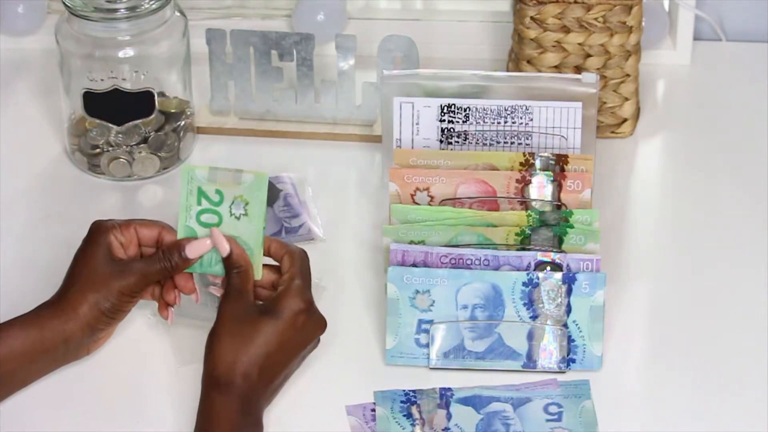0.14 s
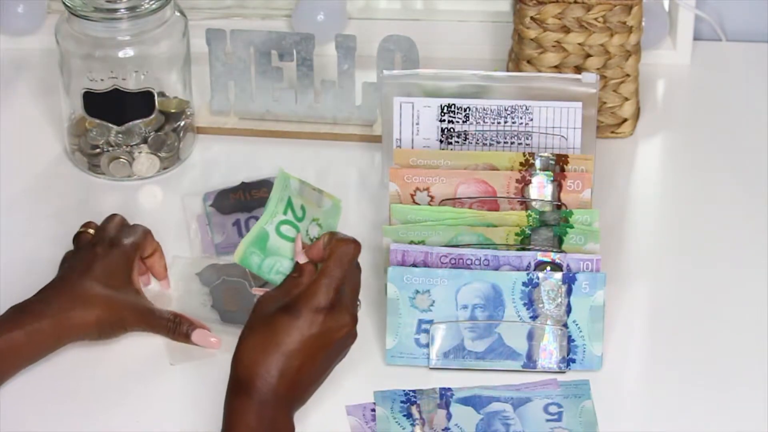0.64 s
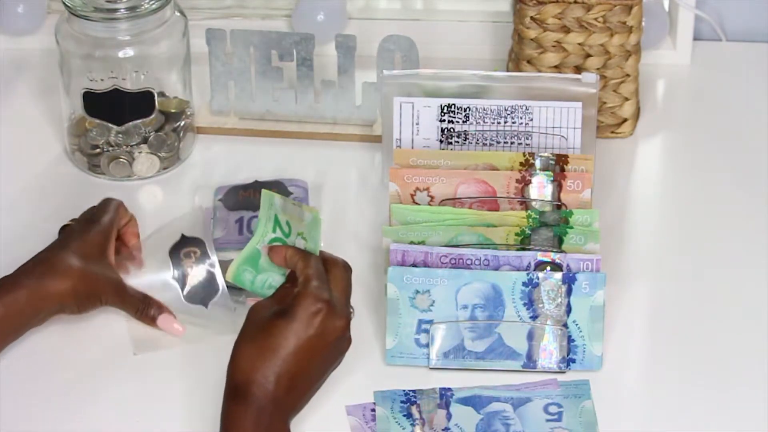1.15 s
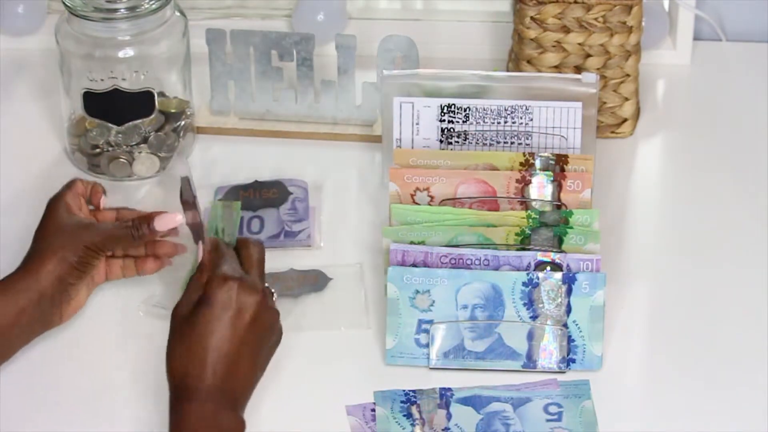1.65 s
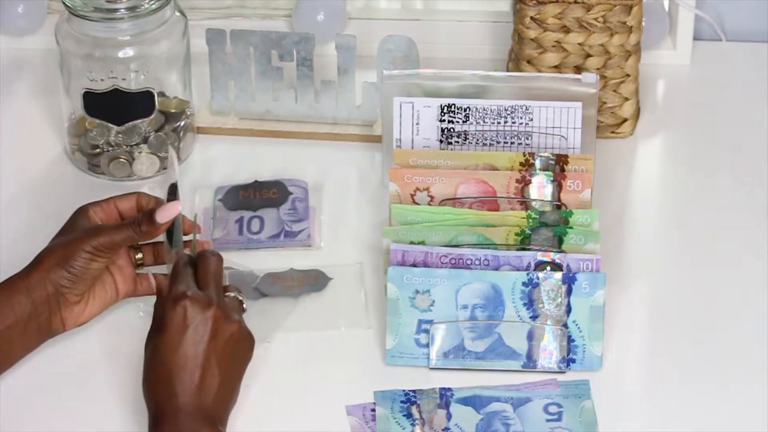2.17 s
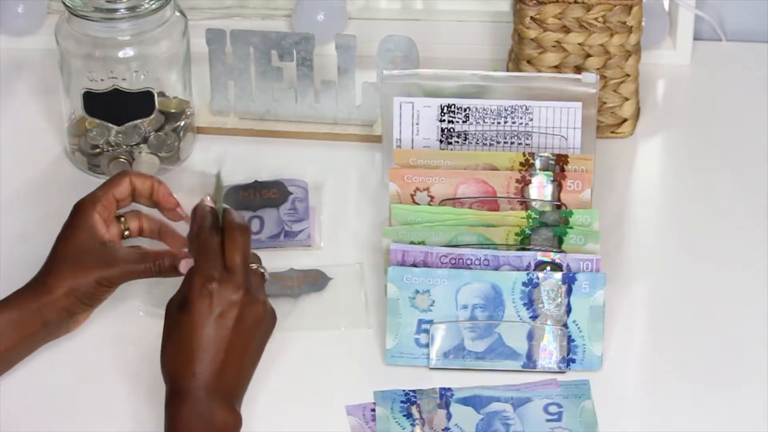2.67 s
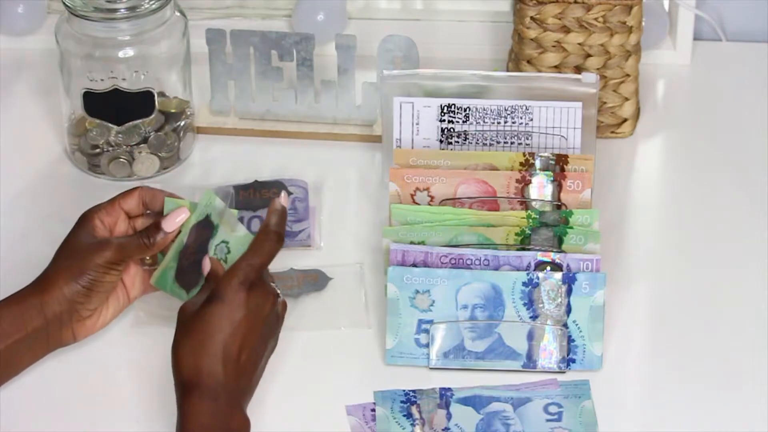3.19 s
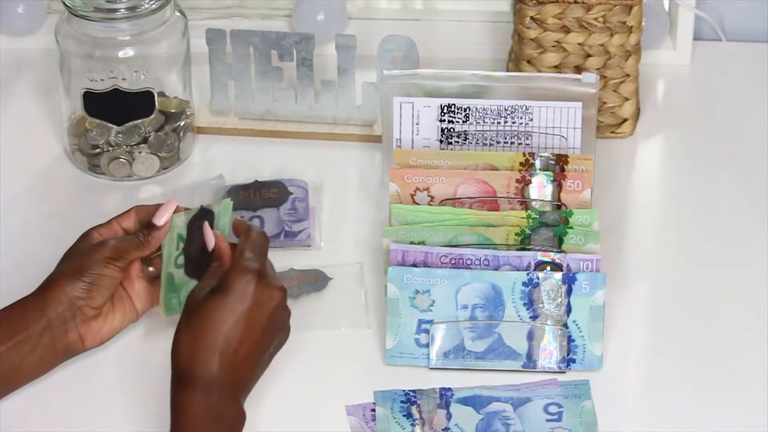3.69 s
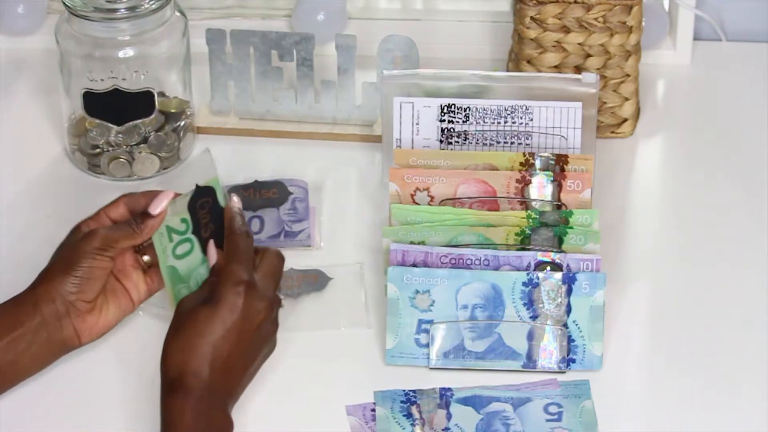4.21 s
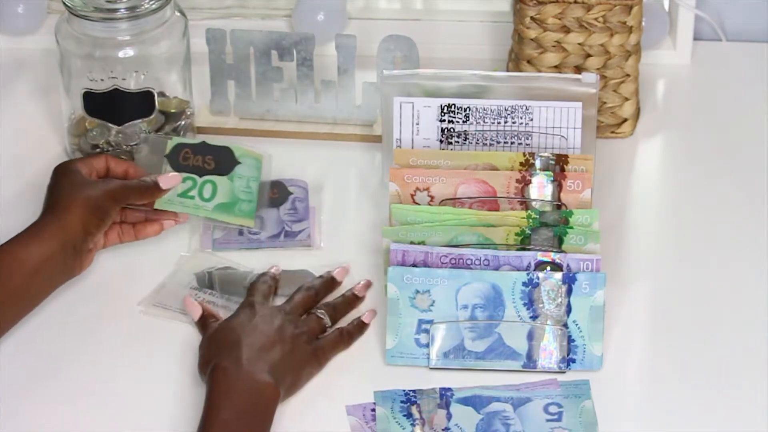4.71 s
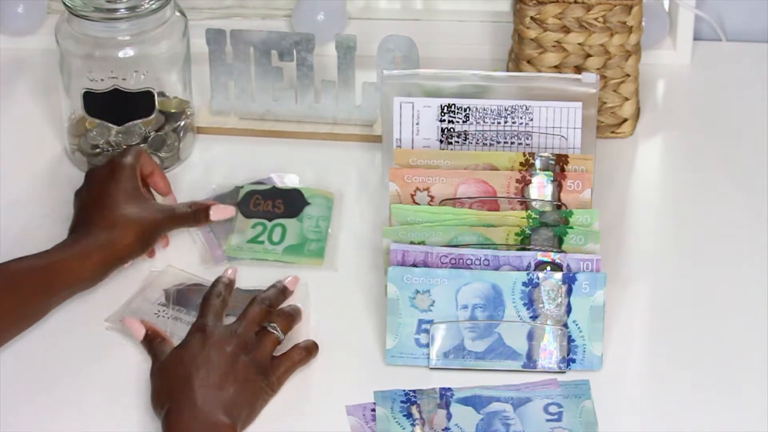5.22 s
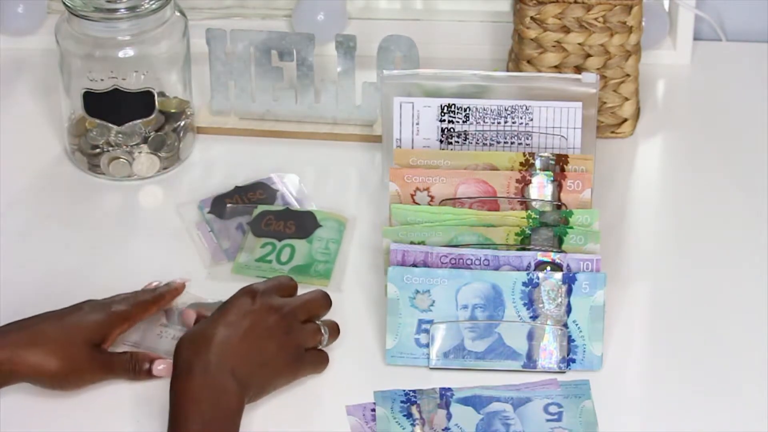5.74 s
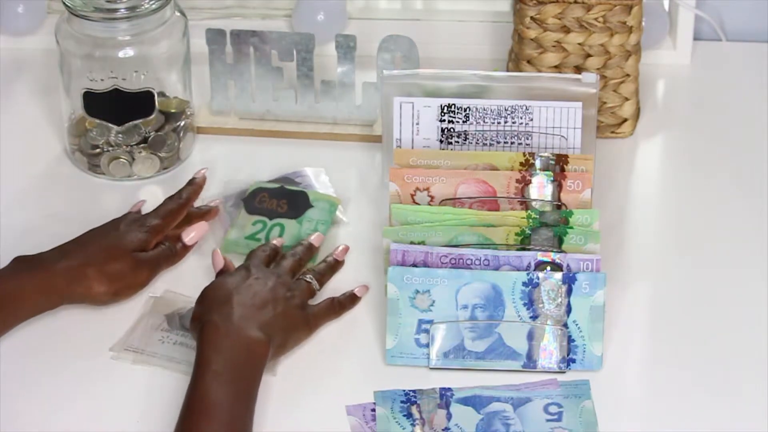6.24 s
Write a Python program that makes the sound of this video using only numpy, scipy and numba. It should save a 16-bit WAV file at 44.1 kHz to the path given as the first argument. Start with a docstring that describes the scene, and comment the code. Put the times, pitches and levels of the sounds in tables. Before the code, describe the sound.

Sharp crinkling clicks and grainy rubs of thin plastic notes, loud at first, then sparse and soft above quiet steady air noise.

```python
"""Stiff polymer banknotes, folded by hand into a clear plastic envelope on a table, half a metre under a phone.
The films snap in bursts of buckling clicks, some with a stronger ring, flap in low thumps and rub with a
grainy hiss; all are shaped noise through resonances. A small room answers with a table bounce and a short
tail. Behind lie a fan's filtered air noise and wavering sine tones. The phone's microphone trims both ends of
the spectrum and its noise suppressor turns down whatever stays near the steady noise."""
import sys
import numpy as np
from scipy import signal
from scipy.fft import rfft, irfft, next_fast_len
from scipy.io import wavfile
from scipy.ndimage import uniform_filter1d
from numba import njit

SR = 44100
rng = np.random.default_rng(int(sys.argv[2]) if len(sys.argv) > 2 else 0)


def volts_from_db(level):
    """Convert decibel levels to linear amplitude ratios."""
    exponent = np.asarray(level, float) / 20
    return 10 ** exponent


def file_out(sig):
    """Save sig as 16-bit WAV at sys.argv[1]."""
    # one column per channel
    cols = np.atleast_2d(sig).T
    # limit, then scale
    lim = np.clip(cols, -1, 1)
    pcm = np.round(lim * 32767).astype(np.int16)
    wavfile.write(sys.argv[1], SR, pcm)


N = 280917
T = np.arange(N) / SR  # s

# All levels of handling sounds are nominal, ahead of the room; fan levels are ahead of the suppressor.
# Fan air, spectrum shape: f/Hz, relative level/dB per Hz
AIR = [(21, -49), (35, -3.5), (123, -11), (163, -5.5), (216, -6.5), (252, -5.5), (286, -6.5), (334, -1),
       (360, -11), (466, -9.5), (907, -12), (979, -11.5), (1910, -17), (12700, -31), (16000, -39)]
# Fan air, left-right likeness: f/Hz, likeness [0-1]
AIR_LIKENESS = [(60, 0.33), (300, 0.26), (640, 0.14), (1500, 0)]
# Fan air, balance: f/Hz, left minus right level/dB
AIR_LEAN = [(100, -4), (400, -2), (1300, 0)]
AIR_DB = -59.5  # rms of the two ears' mean
# Fan blade tone: t/s, f/Hz, level/dB
BLADE = [(0, 278.6, -61), (1, 278.6, -63), (2.299, 274.4, -70.5), (3.2, 283.2, -71), (3.9, 281.5, -62.5),
         (4.2, 289.8, -65.5), (4.5, 294.4, -64.5), (4.9, 281.3, -67), (5.401, 284.4, -64),
         (6.37, 277.7, -64)]
# Fan motor tones: f/Hz, level/dB
MOTOR_TONES = [(92.5, -76), (119, -72), (138.5, -71.5), (207.5, -76), (231, -75.5), (600, -76.5),
               (959, -74.5)]

# Films sliding, one stroke a row: start t/s, firmest t/s, end t/s, rasp level/dB, brightness/dB (+ fizz, - drag)
STROKES = [(-.02, 0.001, 0.014, -54, -36), (0.153, 0.206, 0.45, -62.5, 18), (0.253, 0.315, 0.44, -62, -7),
           (0.417, 0.491, 0.6, -54.5, -7), (0.592, 0.676, 0.75, -63, 6), (.84, 0.962, 1.05, -56.5, -12),
           (1.08, 1.117, 1.29, -63, -3), (1.209, 1.285, 1.388, -48, 9), (1.273, 1.307, 1.39, -61, -11),
           (1.388, 1.474, 1.474, -58.5, -24), (1.576, 1.674, 1.72, -62.5, 12), (1.747, 1.774, 1.85, -65, 3),
           (2.37, 2.488, 2.53, -59.5, 1), (2.547, 2.633, 2.74, -59.5, -12), (2.707, 2.74, 2.89, -51, 19),
           (2.8, 2.933, 3.15, -52, -0.5), (3.036, 3.107, 3.35, -56.5, 5), (3.246, 3.4, 3.77, -56, 4.5),
           (3.637, 3.84, 4.06, -63, 4), (3.97, 4.23, 4.36, -67.5, 3), (4.352, 4.414, 4.48, -72, 11),
           (4.747, 4.756, 4.78, -66, 13), (4.795, 4.845, 5, -71, 35), (4.87, 4.99, 5.1, -64.5, -6),
           (5.076, 5.11, 5.5, -68, -3), (5.535, 5.55, 5.7, -53.5, -18), (5.545, 5.703, 5.813, -49.5, -23.5),
           (5.8, 5.842, 2, -59, -13), (6.119, 6.267, 6.46, -59.5, 26)]
STROKE_END_DB, STROKE_ROUNDNESS = -19, 1.93  # level at both ends of a stroke; 1 = pointed, 2 = domed
DRAG, FIZZ = (-11, -0.39), (-5, 0.27)  # (level over the rasp/dB at brightness 0, dB gained per dB of brightness)
# Corners of the overlapping drag, rasp and fizz bands: f/Hz
RUB_CORNERS_HZ = [500, 1250, 3300, 7000, 18500]
# Air pocket between the films, opened and squeezed by the fingers: t/s, ring f/Hz, ring over the rasp level/dB
POCKET = [(0, 1450, -2), (.3, 3900, -22), (.55, 4400, -35), (.7, 1900, 2), (1.2, 1750, -7),
          (1.36, 1800, -8.5), (1.5, 2920, -2), (1.7, 2000, -28), (2.43, 4600, -23), (2.5, 3140, -18),
          (2.8, 3600, -11), (2.93, 2400, -26), (3.2, 3280, -19), (3.448, 3570, -4), (3.899, 3420, -26),
          (4.2, 2520, -6), (4.848, 6200, -19), (4.98, 4500, -9), (5.051, 2800, -14), (5.55, 2140, -7),
          (5.72, 1760, -3.5), (5.9, 1950, -28), (6.2, 5150, -23), (6.37, 5557, -5)]

# Buckling snaps: t/s, nominal peak level/dB, ring f/Hz, burst length/ms, brightness/dB (+ treble, - bass)
SNAPS = [(.214, -34, 720, 6.9, 5), (0.302, -36.5, 4200, 5.2, 2), (0.385, -25, 5430, 8.5, -1),
         (.496, -35.5, 4600, 11, 10.5), (.5075, -15.5, 4330, 2.5, 9.5), (0.637, -34.5, 1600, 14, 5),
         (.659, -33, 720, 8.7, -9), (0.865, -44.5, 5140, 8.4, 8), (.91, -29, 1150, 9.4, -4),
         (.948, -25, 720, 9.4, -1.5), (1.021, -18, 1960, 3.9, 1), (1.0245, -12, 4630, 1.4, 10),
         (1.127, -37, 1850, 6.4, 4), (1.316, -15.5, 1880, 5.4, -5.5), (1.442, -31.5, 3450, 3.7, -5),
         (1.645, -40.5, 870, 12.4, -3), (1.678, -37, 2590, 10.4, -6), (2.153, -40.5, 1020, 4.7, -6),
         (2.43, -31.5, 5700, 7.5, 13), (2.582, -41, 4500, 6.5, 13), (2.598, -33, 4330, 9, 7),
         (2.612, -30, 3140, 12.5, 7), (2.73, -25, 3670, 10.3, 10), (2.744, -29.5, 1700, 6.9, -11),
         (2.883, -34.5, 3420, 13, 3), (2.907, -30, 970, 9.5, -5), (2.921, -19, 2470, 5.2, -9),
         (2.943, -27.5, 640, 4.8, 4), (3.08, -29.5, 920, 4.5, 5), (3.093, -27, 2370, 8.2, 0.5),
         (3.116, -32, 1880, 13.9, 13.5), (3.185, -39, 2940, 1.6, 0), (3.208, -40.5, 3400, 11, 7),
         (3.225, -39.5, 730, 8.2, -5), (3.302, -42.5, 3270, 13.4, 6), (3.438, -42, 3240, 3.7, 8),
         (3.63, -52, 2220, 7.6, 0), (3.693, -42.5, 2290, 19.3, 3), (3.771, -45.5, 1980, 3.1, 22),
         (4.042, -45.5, 1390, 6.2, 9), (4.404, -45.5, 3270, 4, 12), (4.453, -46, 3000, 3.6, 2.5),
         (4.843, -46, 8060, 6.7, 45), (4.936, -47, 3240, 8.6, 1), (5.503, -43.5, 2100, 7.1, 6),
         (5.548, -36, 2070, 5.3, 3), (5.613, -39.5, 1540, 6.2, 7), (5.649, -37, 1350, 2.3, -3),
         (5.719, -39, 1580, 2.5, -16), (6.14, -47.5, 1965, 9.8, 5)]
# Film snaps with a stronger ring beside the crack: columns as for the snaps
POPS = [(.3875, -17.5, 5230, 1.1, 17), (.4125, -18.5, 5600, 1.1, 11), (1.291, -16, 2180, 6.5, 7),
        (2.473, -27.5, 3250, 1.3, 6.5), (2.964, -28.5, 2670, 3.9, -5), (3.489, -40.5, 3184, 10, 9),
        (3.883, -44, 3320, 18.7, 3), (4.095, -25.5, 2190, 8.2, -2), (4.237, -31.5, 2960, 1.6, 2),
        (5.144, -35, 2650, 7.8, 0), (5.828, -45.5, 1830, 9.1, -1), (6.296, -37.5, 5960, 16, 16)]
SNAP_RING, POP_RING = (-16, 0.32), (-2.5, 0.24)  # (ring level/dB beside the crack, damping)
# Corners of the overlapping crack bands: f/Hz
SNAP_CORNERS_HZ = [200, 430, 1500, 3900, 7300, 19000]
# Crack bands thud, body, edge, crispness: level/dB at brightness 0, gain [dB per dB of brightness]
CRACK = [(-9, -0.9), (-6.5, -.45), (-7.5, 0.21), (-15, 0.78)]
OFF_RING_DB_PER_OCT = 3.5  # a band is weaker the further it lies from the crease's ring
HEAD_SIZE, HEAD_FALL = 45, 1.69  # hard head of a 1 ms burst, and the power of length by which it shrinks
SWELL_PER_MS = 0.045  # share of its length that a burst takes to swell, per ms of length

# The whole sheet flaps and pushes air: t/s, peak level/dB, f/Hz
THUMPS = [(0.912, -35, 480), (0.954, -36.5, 490), (1.024, -31.5, 480), (1.291, -38, 335), (1.316, -45, 330),
          (2.742, -41, 342), (2.908, -58, 336), (2.949, -42, 342), (3.087, -42, 490), (4.095, -41.5, 458)]
THUMP_MS, THUMP_DAMPING = 3.6, 0.49

# Small room, decay by 60 dB: f/Hz, decay time/s
ROOM_T60 = [(300, 0.16), (1000, 0.25), (3000, 0.14), (7000, 0.15), (14000, 0.013)]
# Small room, left-right likeness of the tail: f/Hz, likeness [0-1]
ROOM_LIKENESS = [(300, 0.4), (1000, 0.96), (4000, 0.67), (9000, 0.64)]
ROOM_DB = 0  # tail energy over the direct sound
TABLE_ECHO_MS, TABLE_ECHO_DB = (3.4, 3.43), -3  # delay at left and right, level under the direct sound

# Noise suppressor band edges: f/Hz
GATE_EDGES_HZ = [200, 400, 600, 800, 1000, 1200, 1600, 2000, 2400, 3200, 4000, 4800, 5600, 6800, 8000, 9600,
                 12000]
# cut on steady noise; rises over it at which a band starts to open and is fully open
GATE_CUT_DB, GATE_START_DB, GATE_OPEN_DB = 7, 3, 15.5
TOP_HZ = 15800  # upper edge of the microphone


def on_log(points, hz):
    """Read (Hz, value) points on a log-frequency axis."""
    f, v = np.transpose(points)
    return np.interp(np.log(np.maximum(hz, 1)), np.log(f), v)


def unit(x):
    """Scale to rms 1."""
    return x / np.sqrt(np.mean(x ** 2))


def band(x, lo_hz, hi_hz):
    """Band-pass between two edges."""
    return signal.sosfilt(signal.butter(2, [lo_hz, hi_hz], "band", fs=SR, output="sos"), x)


@njit
def svf(x, hz, damping):
    """State-variable band-pass whose centre may move every sample."""
    y, b, l = np.empty(len(x)), 0., 0.
    for i in range(len(x)):
        g = np.tan(np.pi * hz[i] / SR)
        v = (b + g * (x[i] - l)) / (1 + g * (g + damping))
        b, l, y[i] = 2 * v - b, l + 2 * g * v, damping * v
    return y


def walk(rate):
    """Random levels held 1 / rate s and slewed twice; spread near 1."""
    k = int(SR / rate)
    held = np.repeat(rng.standard_normal(N // k + 1), k)
    return 1.306 * uniform_filter1d(uniform_filter1d(held, k), k)[:N]


def grit(shape, spread_db):
    """Noise whose samples have long-tailed sizes: many tiny slips, a few large."""
    sizes = np.minimum(rng.exponential(size=shape), 5)
    return rng.standard_normal(shape) * volts_from_db(spread_db * sizes)


def film(x, ring_hz, ring_db, damping, corners_hz, levels_db):
    """A thin film's voice: a ring over a broad crack, whose overlapping bands run from low thud to crisp top."""
    n = next_fast_len(len(x))
    spectrum = rfft(x, n)
    octave = np.log2(np.arange(1, n // 2 + 2) * SR / n)
    ring = svf(svf(x, ring_hz, damping), ring_hz, damping)
    out = volts_from_db(ring_db) * unit(ring)
    for k, db in enumerate(levels_db):
        slope = np.interp(octave, np.log2(corners_hz[k:k + 3]), [0, 1, 0])
        crack = irfft(spectrum * np.sin(slope * np.pi / 2) ** 2, n)[:len(x)]
        out = out + volts_from_db(db) * unit(crack)
    return out


def fan():
    """Smooth air noise, more alike in both ears toward the bass, with wavering blade and motor tones."""
    n = next_fast_len(N)
    hz = np.arange(n // 2 + 1) * SR / n
    mid, side = rfft(rng.standard_normal((2, n)), axis=1) * volts_from_db(on_log(AIR, hz))
    likeness = np.clip(on_log(AIR_LIKENESS, hz), 0, 1)
    lean = volts_from_db(np.outer([.5, -.5], on_log(AIR_LEAN, hz)))
    ears = np.sqrt(1 + likeness) * mid + np.outer([1, -1], np.sqrt(1 - likeness) * side)
    air = irfft(lean * ears, n, axis=1)[:, :N]
    air = air * volts_from_db(AIR_DB + 0.32 * walk(1.52)) / np.sqrt(np.mean(air.mean(axis=0) ** 2))
    t, blade_hz, blade_db = np.transpose(BLADE)
    turns = np.cumsum(np.interp(T, t, blade_hz) * (1 + 0.01009 * walk(27.72))) / SR
    tones = volts_from_db(np.interp(T, t, blade_db) + 1.0 * walk(42)) * np.sin(2 * np.pi * turns)
    for f, db in MOTOR_TONES:
        turns = f * np.cumsum(1 + 0.003 * walk(5)) / SR
        tones = tones + volts_from_db(db + 1.2 * walk(4.64)) * np.sin(2 * np.pi * turns)
    # sqrt(2) makes the tone levels rms; the right ear is 2.2 dB louder
    return air + np.sqrt(2) * tones * volts_from_db(np.array([[-1.1], [1.1]]))


def rub():
    """Stick-slip grit that flickers as the grip changes; the air pocket between the films rings with the rasp."""
    power, lean = 1e-12, 0
    for start, firm, end, db, bright_db in STROKES:
        # 0 at the firmest moment, 1 at either end; each side lasts at least 5 ms
        before = (firm - T) / max(firm - start, .005)
        after = (T - firm) / max(end - firm, .005)
        away = np.where(T < firm, before, after)
        grip = volts_from_db(db + STROKE_END_DB * np.minimum(away, 4) ** STROKE_ROUNDNESS) ** 2
        power = power + grip
        lean = lean + bright_db * grip
    rasp_db, bright_db = 10 * np.log10(power), lean / power
    t, pocket_hz, pocket_db = np.transpose(POCKET)
    ring_hz = np.interp(T, t, pocket_hz)
    ring_db = rasp_db + np.interp(T, t, pocket_db)
    drag_db = rasp_db + DRAG[0] + DRAG[1] * bright_db
    fizz_db = rasp_db + FIZZ[0] + FIZZ[1] * bright_db
    slips = grit(N, spread_db=3.0) * volts_from_db(1.1 * walk(90))
    return film(slips, ring_hz, ring_db, 0.37, RUB_CORNERS_HZ, [drag_db, rasp_db, fizz_db])


def bursts(rows, ring_db, damping):
    """Buckling film: short bursts are single hard clicks; long ones swell and trail off as many small slips."""
    lead = 256  # samples of space ahead of each onset
    t = (np.arange(4096) - lead) * 1000 / SR  # ms
    out = np.zeros(N + 4096)
    for (s, db, hz, ms, bright_db), slips in zip(rows, grit((len(rows), len(t)), spread_db=3.5)):
        colour_db = []
        for (base_db, share), centre_hz in zip(CRACK, SNAP_CORNERS_HZ[1:]):
            off_ring_db = OFF_RING_DB_PER_OCT * abs(np.log2(centre_hz / hz))
            colour_db.append(base_db + share * bright_db - off_ring_db)
        trail = np.exp(-t / ms) * np.clip(t / (SWELL_PER_MS * ms ** 2), 0, 1)
        # the crease gives way at once: a hard head, stronger the shorter the burst
        head = HEAD_SIZE / ms ** HEAD_FALL * np.exp(-np.maximum(t, 0) / 1.94) * (t >= 0)
        ring_hz = np.full(len(t), 1. * hz)
        sound = film(slips * (head + trail), ring_hz, ring_db, damping, SNAP_CORNERS_HZ, colour_db)
        mean_level = np.sqrt(np.sum(sound ** 2) / (ms * SR / 1000))
        i = int(s * SR) - lead
        # peaks stand well over the burst's mean level
        out[i:i + len(t)] += sound * volts_from_db(db - 9.0) / mean_level
    return out[:N]


def snaps():
    """Creases buckle: bursts of crack with the weaker, more damped ring."""
    return bursts(SNAPS, *SNAP_RING)


def pops():
    """Film snaps with a stronger, less damped ring beside the crack."""
    return bursts(POPS, *POP_RING)


def thumps():
    """A soft low knock as the sheet pushes air: a short noise shudder through two damped rings of one pitch."""
    t = np.arange(4096) * 1000 / SR  # ms
    out = np.zeros(N + 4096)
    for (s, db, hz), shudder in zip(THUMPS, rng.standard_normal((len(THUMPS), len(t)))):
        ring_hz = np.full(len(t), 1. * hz)
        knock = svf(shudder * np.exp(-t / THUMP_MS), ring_hz, THUMP_DAMPING)
        knock = svf(knock, ring_hz, THUMP_DAMPING)
        i = int(s * SR)
        out[i:i + len(t)] += knock * volts_from_db(db) / np.max(np.abs(knock))
    return out[:N]


def room(x, count=12):
    """Direct sound, its table bounce, and a tail whose top dies first; each stretch of time draws its own tail."""
    t = np.arange(int(.35 * SR)) / SR
    tail = 0
    for hz in 230 * 2. ** np.arange(7):
        noise = rng.standard_normal((2, count, len(t)))
        octave = band(noise, hz / np.sqrt(2), min(hz * np.sqrt(2), .45 * SR))
        mid, side = octave * np.exp(-np.log(1000) * t / on_log(ROOM_T60, hz))
        likeness = np.clip(on_log(ROOM_LIKENESS, hz), 0, 1)
        tail = tail + np.sqrt(1 + likeness) * mid
        tail = tail + np.multiply.outer([1, -1], np.sqrt(1 - likeness) * side)
    tail = tail * np.clip(t / 0.0023, 0, 1)  # builds up over 2.3 ms
    response = tail * volts_from_db(ROOM_DB) / np.sqrt(np.mean(np.sum(tail ** 2, axis=2)))
    response[:, :, 0] += 1
    for ear, ms in enumerate(TABLE_ECHO_MS):
        response[ear, :, int(ms * SR / 1000)] += volts_from_db(TABLE_ECHO_DB)
    # each of count equal stretches of time has its own diffuse tail
    size = N // count + 1
    pieces = signal.fftconvolve(np.resize(x, (1, count, size)), response, axes=2)
    out = np.zeros((2, count * size + len(t)))
    for k in range(count):
        out[:, k * size:(k + 1) * size + len(t) - 1] += pieces[:, k]
    return out[:, :N] / np.sqrt(np.mean(np.sum(response ** 2, axis=2)))


def suppress(x):
    """Band by band, turn down what stays near the steady noise; tails are cut short as they sink into it."""
    hz, _, z = signal.stft(x, SR, nperseg=512, noverlap=384)
    which = np.searchsorted(GATE_EDGES_HZ, hz)
    band_starts = np.flatnonzero(np.diff(which, prepend=-1))
    power = np.add.reduceat(np.abs(z.mean(axis=0)) ** 2, band_starts, axis=0)
    db = 10 * np.log10(uniform_filter1d(power, size=5, axis=1) + 1e-18)
    # the lower quartile of a band's level stands for its steady noise
    over = db - np.percentile(db, 25, axis=1, keepdims=True)
    opened = np.clip((over - GATE_START_DB) / (GATE_OPEN_DB - GATE_START_DB), 0, 1)
    gain = volts_from_db(-GATE_CUT_DB * (1 - opened))[which]
    return signal.istft(z * gain, SR, nperseg=512, noverlap=384)[1][:, :N]


def scene():
    """Handling sounds in the room, over the fan."""
    handling = rub() + snaps() + pops() + thumps()
    return room(handling) + fan()


def low_pass(x):
    """Removes everything above the highest recorded frequency."""
    return signal.sosfilt(signal.butter(12, 16390, fs=SR, output="sos"), x)


def record(dry):
    """The phone's microphone drops the deepest bass and the top; its noise suppressor follows."""
    mic = signal.sosfilt(signal.butter(4, 48, "high", fs=SR, output="sos"), dry)
    mic = signal.sosfilt(signal.ellip(8, .2, 60, TOP_HZ, fs=SR, output="sos"), mic)
    mix = suppress(mic)
    return low_pass(mix)


dry = scene()
out = record(dry)
file_out(out)
```